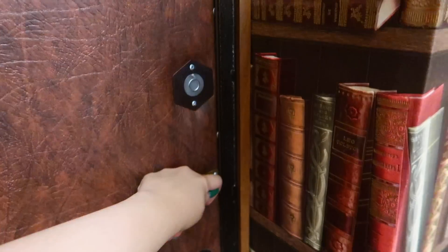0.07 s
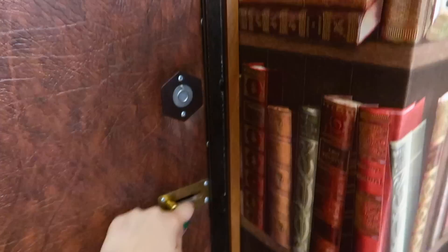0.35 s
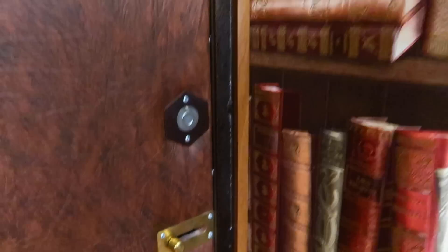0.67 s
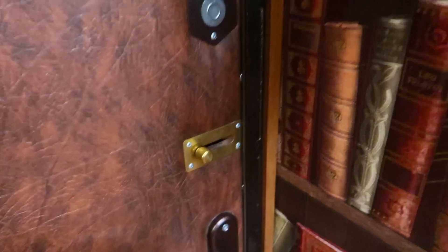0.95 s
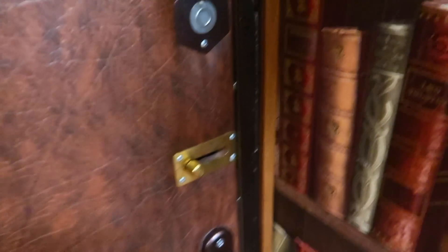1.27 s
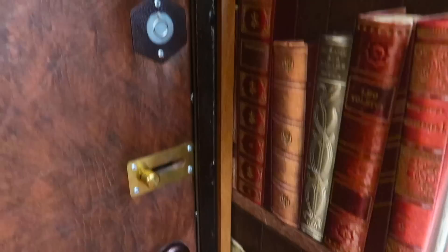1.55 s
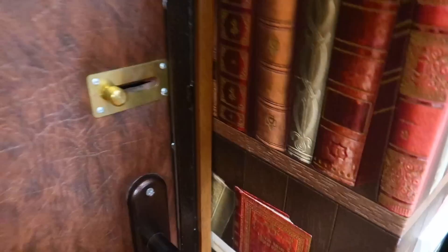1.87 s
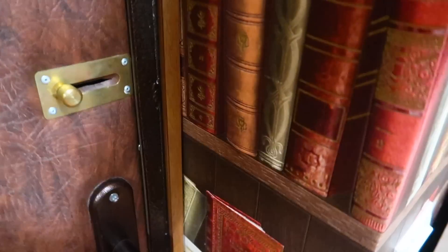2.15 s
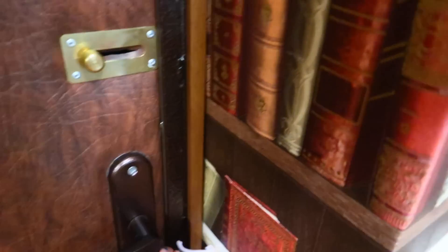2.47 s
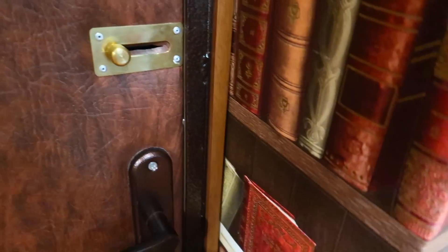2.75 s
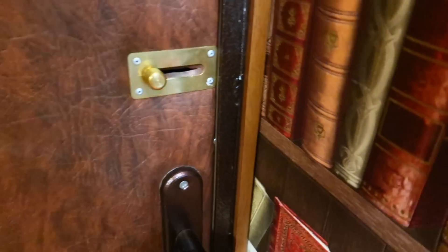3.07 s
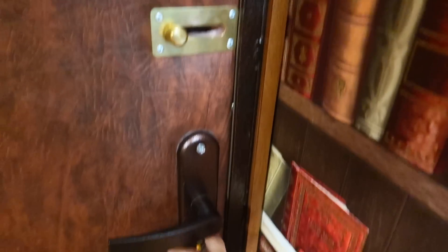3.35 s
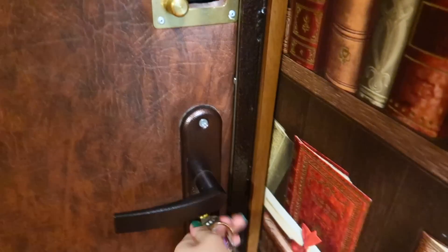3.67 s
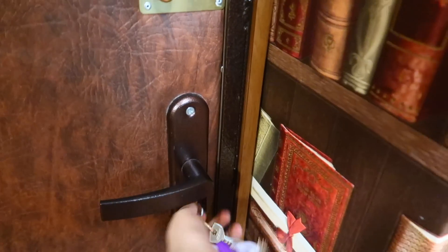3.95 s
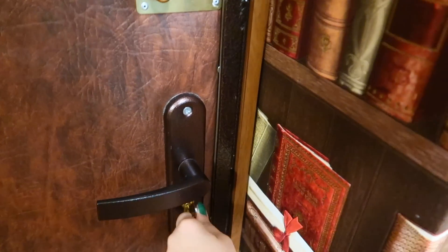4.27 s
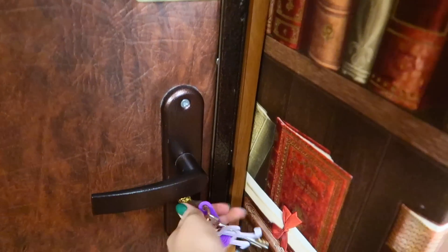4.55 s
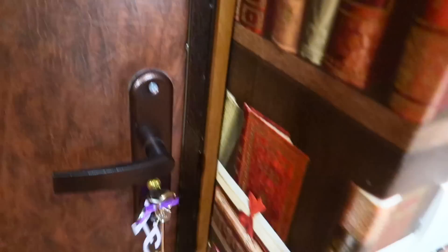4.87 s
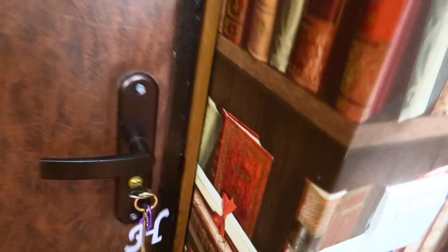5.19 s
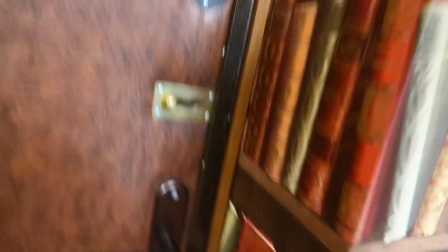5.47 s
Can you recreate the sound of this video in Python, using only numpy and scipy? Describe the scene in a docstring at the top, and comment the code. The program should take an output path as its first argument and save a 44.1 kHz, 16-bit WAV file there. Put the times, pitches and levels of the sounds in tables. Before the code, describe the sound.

A padded metal door is locked up close in a small apartment hall, its hits echoing briefly off near walls. A sleeve brushes softly, and at 0.3 seconds the door booms and rattles. More heavy knocks and low thumps come around 0.9 to 1.2 seconds, and a slide bolt slams home sharply at 1.5.

From 1.8 seconds a bunch of keys jingles, thin and bright, strongest near 2.5, while a key scrapes into the cylinder with small clicks. The key turns, and the steel lock clunks solidly at 3.1, then several more times between 3.5 and 4 amid tinkling. Another loud clunk lands at 4.5, and a sharp click with a bright key clink at 4.75.

From about 5.1 seconds to the end, fingers bump, scrape and creak on the microphone over a few last clicks and jingles. Faint room tone and handling rumble lie underneath throughout.

```python
"""In the small hall of a flat, a padded metal door is locked.
A sleeve brushes the padding, the slide bolt slams home and the door leaf booms. Then a bunch of keys
jingles, a key scrapes into the cylinder and turns, and the lock case clicks and clunks. Blows ring the
modes of leaf and case and echo off near walls; sliding parts stick and slip. Under it all lie still
air and the rumble of a hand on the microphone, which bumps, scrapes and creaks at the end."""
import sys
import numpy as np
from scipy import signal
from scipy.fft import rfft, irfft
from scipy.io import wavfile

SR = 44100
rng = np.random.default_rng(int(sys.argv[2]) if len(sys.argv) > 2 else 0)


def int16_out(signal):
    """Quantize to a 16-bit WAV file."""
    q = np.round(np.clip(np.atleast_2d(signal).T, -1, 1) * 32767)
    wavfile.write(sys.argv[1], SR, q.astype(np.int16))


N = 247930
AGE = np.arange(SR // 2) / SR   # seconds since a blow
MODE_SCATTER_DB, MODE_DETUNE = 2, .018   # each blow lands on another spot, under another load
PART_HZ, KEEPER_HZ = 4000, 5100   # ring of a middling steel part; of the keeper

# modes of the door leaf and, at the top, its bolt plate: f/Hz, level/dB, t60/s
LEAF_MODES = [(137, -8, 0.25), (167.3, -2.5, 0.27), (188.4, -3, 0.2), (223, -5.5, 0.23), (287.4, 4, 0.063),
              (331.4, 3.5, 0.1), (366, 9, 0.12), (410, 10, 0.089), (490, 8, 0.089), (571.5, 8.5, 0.064),
              (790, -1, 0.074), (854, -4, 0.12), (914, 8, 0.08), (1034, 20, 0.014), (1058, 6.5, 0.095),
              (1195, 10.5, 0.033), (1242, 12, 0.093), (1330, 8, 0.1), (1464, -14, 0.053),
              (1520, 27, 0.0097), (1868, -1.5, 0.078), (2000, -8, 0.16), (3500, 21.5, 0.02),
              (4900, -10, 0.058)]
# the three clear key tones: f/Hz, t60/s, phase lead of the left side/rad
CLEAR_KEY_TONES = [(8181, 0.22, 1.15), (10265, 0.38, 1.3), (13158, 0.2, 1.6)]
# spectrum of the jingling bunch: f/Hz, level/dB
JINGLE_SPECTRUM = [(3000, 23.5), (5200, 14), (7500, 9.5), (10000, 15.5), (13000, 8.5), (15500, 0)]


def from_db(db):
    """Decibels to gain."""
    return 10 ** (np.asarray(db) / 20)


def rms_one(x):
    """Scale to unit power."""
    return x / np.sqrt(np.mean(x ** 2) + 1e-20)


def at_hz(points, hz):
    """Read a table on a log-frequency axis."""
    f, value = np.transpose(points)
    return np.interp(np.log(np.maximum(hz, 1)), np.log(f), value)


def band(x, low, high, order=2):
    """Causal band-pass."""
    sos = signal.butter(order, [low, min(high, .45 * SR)], "band", fs=SR, output="sos")
    return signal.sosfilt(sos, x + 1e-18)


def colour(x, spectrum):
    """Give a steady sound a spectrum."""
    return irfft(rfft(x) * from_db(at_hz(spectrum, np.fft.rfftfreq(N, 1 / SR))), N)


def resonance(x, hz, width_hz):
    """Two-pole resonance with unit gain at its peak."""
    r = np.exp(-np.pi * width_hz / SR)
    feedback = [1, -2 * r * np.cos(2 * np.pi * hz / SR), r * r]
    return signal.lfilter((1 - r * r) / 2 * np.array([1, 0, -1]), feedback, x + 1e-18)


def rise(seconds):
    """Attack with the given time constant."""
    return 1 - np.exp(-AGE / seconds)


def fade(t60):
    """Decay by 60 dB in t60 seconds."""
    return np.exp(-np.log(1000) * AGE / max(t60, .002))


def add(track, s, sound):
    """Mix a sound in at s seconds."""
    i = int(s * SR)
    track[..., i:i + sound.shape[-1]] += sound[..., :N - i]


def diffuse(mid, side):
    """Sound from all around: alike at both ears in the bass, wide in the treble."""
    # side relative to mid: f/Hz, level/dB
    width = [(30, -40), (60, -46), (250, -14), (500, -22.5), (1000, -11), (2000, -11.5), (4000, -5),
             (8000, 0), (13000, 10.5)]
    return mid + colour(side, width) * [[1], [-1]]


def gestures(rows, attack_s, release_t60):
    """Each movement swells, holds and dies away; one gain curve per level column."""
    t, power = np.arange(N) / SR, 0
    for s, length, *db in rows:
        swell = np.clip((t - s) / attack_s, 0, 1)
        release = np.exp(-np.log(1000) * np.clip((t - s - length) / release_t60, 0, 2))
        power = power + (from_db(db)[:, None] * swell * release) ** 2
    return np.sqrt(power)


def slips(per_s, spread_db, smooth):
    """Tiny random stick-slip contacts over smooth friction, in two channels."""
    sizes = from_db(spread_db * np.minimum(rng.exponential(1, N), 4)) * (rng.random(N) < per_s / SR)
    grains = signal.lfilter([1], [1, -np.exp(-1 / (0.0041 * SR))], sizes)
    return (rms_one(grains) + smooth) * rng.standard_normal((2, N))


def blow(modes, register_db, rings, clatter_t60, clatter_db, crack_t60, crack_db, seat_s, treble_t60):
    """A crack, a clatter of dense modes and the body's main modes, balanced in five registers."""
    # edges of the boom, body, clack, tick and edge registers: f/Hz
    edges = [125, 300, 800, 2300, 7000, 14000]
    body = sum(from_db(db + rng.normal(0, MODE_SCATTER_DB)) * rng.choice([-1, 1]) * fade(t60)
               * np.sin(2 * np.pi * hz * rng.normal(1, MODE_DETUNE) * AGE) for hz, db, t60 in modes)
    envelope = from_db(clatter_db) * fade(clatter_t60) + from_db(crack_db) * fade(crack_t60)
    clatter = envelope * rng.standard_normal(len(AGE))
    # the struck parts add short rings of their own: f/Hz, relative bandwidth, level/dB
    parts = sum(from_db(db) * resonance(clatter, hz, damping * hz) for hz, damping, db in rings)
    hit = (body + clatter + parts) * rise(seat_s)
    out = 0
    for db, low, high in zip(register_db, edges, edges[1:]):
        losses = fade(treble_t60 * (PART_HZ / low))   # higher registers die sooner
        register = band(hit, low, high, order=3) * losses
        onset_rms = np.sqrt(np.mean(register[AGE < .02] ** 2))
        out = out + from_db(db) * register / onset_rms
    return out


def background():
    """Still air, and the rumble and rustle of a hand shifting on the microphone's case."""
    # room tone of the flat: f/Hz, level/dB
    air_spectrum = [(25, -5), (100, -0.5), (300, -8.5), (600, -5.5), (1200, -17.5), (3000, -19),
                    (7000, -31), (15000, -46)]
    # handling noise over time: t/s, rumble/dB, rustle/dB
    handling = [(0.0, -68, -59), (0.14, -68, -53.5), (0.45, -55, -50), (0.81, -55.5, -51),
                (1.11, -38.5, -38.5), (1.31, -55, -52.5), (1.81, -48, -52), (2.24, -60, -45.5),
                (3.46, -70, -53.5), (3.72, -66, -47), (4.05, -54, -50), (4.63, -70, -49), (4.88, -63, -61),
                (5.13, -69, -52.5), (5.31, -46, -37), (5.62, -54, -46)]
    times, *levels = np.transpose(handling)
    rumble_db, rustle_db = (np.interp(np.arange(N) / SR, times, db) for db in levels)
    air, hand = (diffuse(*rng.standard_normal((2, N))) for _ in range(2))
    rumble = from_db(rumble_db + 7) * rms_one(band(colour(hand, [(30, 7.0), (80, -19)]), 33.7, 62.0))
    rustle = from_db(rustle_db + 4) * rms_one(band(hand, 54, 260))
    return from_db(-51) * rms_one(colour(air, air_spectrum)) + rumble + rustle


def sleeve():
    """Hand and sleeve brush over the door's padding in soft swells."""
    # brushing movements: t/s, length/s, level/dB
    brushes = [(0.02, 0.18, -53), (0.485, 0.055, -41), (0.58, 0.16, -58), (0.8, 0.1, -57.5),
               (1.26, 0.16, -63), (1.38, 0.21, -56), (1.68, 0.13, -61), (1.8, 0.18, -45.5)]
    # cloth on padding: f/Hz, level/dB
    cloth_spectrum = [(300, 0), (700, -4), (1500, -0.5), (3000, -11.5), (6000, -19.5), (12000, -30),
                      (16000, -54)]
    swells, = gestures(brushes, attack_s=0.036, release_t60=0.28)
    friction = diffuse(*slips(per_s=120, spread_db=0, smooth=1.0))
    return swells * rms_one(colour(friction, cloth_spectrum))


def bolt():
    """The slide bolt snaps against plate and keeper on the padded leaf; softer contacts are duller."""
    # bolt contacts: t/s, clunk/dB, tick/dB, ring of the part/Hz, clatter t60/s, top of the spectrum/Hz
    snaps = [(0.158, -59, -31.5, 2220, 0.025, 3120), (0.233, -30, -83, 2970, 0.026, 676),
             (0.687, -27, -80, 4730, 0.013, 620), (0.838, -38, -44, 3900, 0.074, 6960),
             (1.06, -52, -30.5, 2800, 0.017, 4400), (1.113, -43, -20, 2880, 0.067, 8100),
             (1.132, -32, -34, 2600, 0.09, 6500), (1.496, -26, -9.5, 2670, 0.14, 8200),
             (1.504, -21.5, -19.5, 3180, 0.0092, 7500)]
    out = np.zeros(N)
    for s, clunk_db, tick_db, ring_hz, clatter_t60, top_hz in snaps:
        clack_db = (clunk_db + tick_db) / 2 + 3.5
        register_db = [clunk_db - 3, clunk_db, clack_db, tick_db, tick_db - 8.5]
        rings = [(500, .3, 7), (950, .25, 9), (ring_hz, .33, 15), (KEEPER_HZ, .25, -3)]
        hit = blow(LEAF_MODES, register_db, rings, clatter_t60, clatter_db=21,
                   crack_t60=0.011, crack_db=22.5, seat_s=0.00034, treble_t60=0.4)
        add(out, s, from_db(-8.5) * band(hit, 37, top_hz, order=3))
    return out


def door():
    """The leaf booms and clacks under heavy knocks, each taking a moment to seat, and rattles back."""
    # knocks and rebounds: t/s, boom/dB, body/dB, clack/dB, tick/dB, edge/dB, clatter t60/s
    knocks = [(0.306, -17, -15.5, -35, -35, -58, 0.048), (0.3133, -16, -19, -14.5, -18, -31.5, 0.041),
              (0.329, -7, -9, -18, -25.5, -35, 0.037), (0.362, -26, -22, -24, -54, -54, 0.05),
              (0.38, -22, -21, -28, -50, -60, 0.038), (0.935, -15, -24, -28, -34, -31, 0.14),
              (0.943, -22, -14, -20, -27, -28.5, 0.066), (0.965, -42, -24.5, -52, -49, -43, 0.12),
              (1.003, -25, -30, -36, -57, -52, 0.072), (1.03, -35, -32, -42, -56, -58, 0.06),
              (1.143, -21, -22, -41, -47, -55, 0.094), (1.178, -27, -33.5, -55, -60, -75, 0.046),
              (1.564, -33, -22, -34, -54, -51, 0.069), (1.58, -28, -17.5, -27.5, -35.5, -47, 0.072),
              (1.587, -29.5, -24, -36, -40, -54, 0.059), (1.618, -39, -25.5, -41, -50, -69, 0.06)]
    rings = [(4300, .25, 15), (KEEPER_HZ, .2, 4)]   # bolt plate and keeper
    out = np.zeros(N)
    for s, *register_db, clatter_t60 in knocks:
        hit = blow(LEAF_MODES, register_db, rings, clatter_t60, clatter_db=15,
                   crack_t60=0.039, crack_db=-21, seat_s=0.001, treble_t60=0.39)
        add(out, s, from_db(-4) * hit)
    return out


def rubbing():
    """Stick-slip strokes grate over a humming body, and the bunch of keys rustles and tinkles."""
    # scraping strokes of bolt and key, and of fingers on the microphone at the end:
    # t/s, length/s, body/dB, grit/dB
    strokes = [(0.4, 0.057, -37.5, -61), (0.495, 0.028, -32.5, -55), (0.785, 0.025, -36, -71),
               (0.99, 0.074, -38.5, -51.5), (1.12, 0.0065, -33, -36), (1.2, 0.059, -46.5, -80),
               (1.585, 0.043, -33.5, -48.5), (1.89, 0.24, -39, -43), (2.2, 0.39, -35, -43),
               (2.43, 0.093, -30, -44.5), (2.76, 0.13, -36, -53.5), (3.025, 0.095, -35.5, -46.5),
               (3.1, 1, -43, -57), (3.49, 0.22, -37, -52), (3.66, 0.062, -34, -41.5),
               (3.79, 0.56, -58, -75), (4.0, 0.27, -42.5, -54), (4.47, 0.052, -30, -42),
               (4.56, 0.11, -36, -49.5), (4.73, 0.067, -44, -54), (4.97, 0.26, -46.5, -50.5),
               (5.25, 0.055, -62, -40), (5.37, 0.37, -50, -57)]
    # the bunch is shaken or brushes the hand: t/s, length/s, level/dB
    shakes = [(1.86, 0.061, -30.5), (1.99, 0.025, -24), (2.12, 0.05, -31), (2.22, 0.18, -33),
              (2.43, 0.17, -38), (2.52, 0.096, -25), (2.71, 0.058, -35), (3.08, 0.49, -56),
              (3.52, 0.15, -31.5), (3.64, 0.091, -36), (3.79, 0.024, -35), (3.965, 0.055, -42),
              (4.04, 0.12, -50), (4.32, 0.16, -54), (4.62, 0.085, -43.5), (4.7, 0.1, -26.5),
              (4.89, 0.022, -43), (5.125, 0.21, -40.5), (5.25, 0.16, -42)]
    # colour of the scraping: f/Hz, level/dB
    scrape_spectrum = [(250, -39), (380, 2.5), (460, 10.5), (620, -1.5), (900, -5), (1400, -7.5),
                       (2400, -14.5), (4000, -18)]
    pressure, grit = gestures(strokes, attack_s=0.0093, release_t60=0.29)
    shaking, = gestures(shakes, attack_s=0.023, release_t60=0.17)
    contacts = diffuse(*slips(per_s=260, spread_db=3, smooth=.6))
    grating = colour(contacts, scrape_spectrum)
    body = from_db(-1) * pressure * rms_one(band(grating, 368, 744, order=3))
    scrape = from_db(2) * grit * rms_one(band(grating, 1340, 5700))
    rustle = .7 * rms_one(band(colour(contacts, JINGLE_SPECTRUM), 3000, 16500))
    chinks = .9 * tinkle(per_s=1300, t60=.1, spread_db=2.8, pitch_count=56)
    return body + scrape + from_db(-9) * shaking * (rustle + chinks) + key_shimmer(shaking)


def clinks():
    """Small steel parts touch: high modes ring for an instant while the parts skid and chatter."""
    # touches of keys, key ring and other small steel: t/s, level/dB, f/Hz
    touches = [(0.693, -43.5, 5640), (0.888, -44.5, 11200), (1.859, -36, 9100), (1.881, -31.5, 8230),
               (1.892, -37, 8400), (2.002, -23, 13700), (2.009, -29, 14000), (2.147, -35, 13000),
               (2.23, -25, 13300), (2.242, -26.5, 10800), (2.25, -31, 13400), (2.286, -35, 11600),
               (2.31, -25, 6730), (2.311, -27, 13400), (2.356, -29, 10000), (2.501, -37, 8000),
               (2.509, -34, 8000), (2.524, -19, 8400), (2.533, -22, 13000), (2.59, -22, 5250),
               (2.603, -24, 12300), (2.611, -32, 12400), (2.619, -22.5, 5300), (2.738, -19.5, 4900),
               (2.71, -26, 5200), (2.753, -28.5, 9800), (2.761, -31, 6460), (2.856, -46, 8100),
               (2.999, -31.5, 7300), (3.03, -39, 7400), (3.039, -35, 7050), (3.758, -15, 5400),
               (3.758, -24, 10100), (3.768, -20, 7260), (3.8602, -16, 6070), (4.047, -27.5, 5900),
               (4.103, -26.5, 7400), (4.134, -28.5, 6770), (4.39, -44, 11200), (4.436, -31, 9560),
               (4.449, -33, 8900), (4.695, -22, 6000), (4.744, -29, 6400), (4.757, -4, 5300),
               (4.764, -20, 5700), (4.961, -45, 4300), (5.112, -43, 11800), (5.132, -28, 12000),
               (5.314, -31, 10200), (5.422, -25, 12800)]
    # modes of a small part: multiple of the pitch, level/dB
    modes = [(.86, -8), (1, 4.5), (1.09, -10.5), (1.31, -15.5), (1.621, -17)]
    envelope = fade(0.0098) + from_db(-28) * fade(0.043)   # contact damps the ring; a thin tail lingers
    out = np.zeros(N)
    for s, db, hz in touches:
        ring = sum(from_db(mode_db)
                   * np.sin(2 * np.pi * (hz * ratio * rng.normal(1, MODE_DETUNE) * AGE + rng.random()))
                   for ratio, mode_db in modes)
        skid = rms_one(resonance(rng.standard_normal(len(AGE)), hz, 0.12 * hz))
        chatter = from_db(-5.5) * skid * fade(0.034)
        add(out, s, from_db(db - 5) * (ring * envelope + chatter) * rise(0.00063))
    return out


def thumps():
    """Dull low thumps: first at the door, then handling bumps on the microphone."""
    # low, dying tones: t/s, level/dB, f/Hz, t60/s
    bumps = [(0.937, -16, 66, 0.1), (0.939, -25.5, 106, 0.27), (1.148, -19.5, 31.06, 0.79),
             (1.151, -24, 101, 0.35), (5.128, -28, 141, 0.17), (5.141, -15.5, 71, 0.086),
             (5.141, -30, 37.8, 0.53), (5.597, -31.5, 145, 0.3)]
    out = np.zeros(N)
    for s, db, hz, t60 in bumps:
        add(out, s, from_db(db) * np.sin(2 * np.pi * hz * AGE) * fade(t60))
    return out


def lock():
    """Key, pins and levers strike inside the steel case; a faint hiss swells just before each click."""
    # contacts in the lock: t/s, clunk/dB, tick/dB, clunk/Hz, ring of the part/Hz
    clicks = [(1.852, -38, -43, 437, 6100), (1.968, -20, -37.5, 484, 2900), (2.002, -18.5, -32, 392, 8400),
              (2.093, -19, -20, 560, 2740), (2.234, -27, -35.5, 453, 5600), (2.31, -26, -29.5, 441, 4400),
              (2.457, -19, -30.5, 410, 4900), (2.501, -24.5, -40, 443, 8100), (2.71, -57, -42, 463, 5070),
              (2.725, -38, -47, 430, 5100), (2.754, -33, -36.5, 550, 5700), (2.854, -41, -60, 450, 8170),
              (3.384, -46, -43.5, 443, 5030), (3.051, -15.5, -38.5, 490, 3020),
              (3.071, -25.5, -44, 436, 2260), (3.0947, -12.5, -20.5, 483, 2870),
              (3.099, -9.5, -22.5, 500, 2400), (3.272, -44, -31.5, 440, 5370), (3.308, -42, -37, 430, 4900),
              (3.491, -21.5, -43.5, 420, 3720), (3.547, -24.5, -50, 443, 8100),
              (3.584, -14.5, -24, 490, 2900), (3.594, -18.5, -24, 474, 4700),
              (3.637, -23.5, -33, 454, 5100), (3.758, -48, -25.5, 400, 5050),
              (3.768, -26.5, -21, 405, 5000), (3.799, -15, -28.5, 490, 2650), (3.839, -30, -51, 450, 3500),
              (3.861, -39, -41, 426, 6100), (3.964, -19, -35, 470, 2660), (3.977, -26, -28, 463, 4050),
              (4.003, -37, -32, 540, 6650), (4.046, -61, -49, 425, 5650), (4.102, -31, -36, 624, 6360),
              (4.171, -25.5, -55, 467, 4600), (4.185, -67, -42.5, 455, 5100), (4.23, -37, -35.5, 454, 5000),
              (4.316, -31.5, -48, 430, 2780), (4.442, -27, -34.5, 595, 6840), (4.516, -21, -31, 510, 4300),
              (4.521, -6.5, -17, 640, 4300), (4.527, -15.5, -34, 725, 2360), (4.548, -28.5, -58, 646, 2300),
              (4.691, -24, -28, 480, 5670), (4.702, -33, -27, 557, 5100), (4.743, -28, -34, 524, 6420),
              (4.7585, -14.5, -14.5, 436, 2830), (4.777, -23, -57, 455, 4780), (4.802, -29, -53, 450, 2600),
              (4.822, -32, -41, 440, 2400), (4.849, -30.5, -30.5, 441, 4130),
              (4.872, -32.5, -29, 420, 5600), (4.953, -29.5, -40.5, 487, 4630),
              (4.958, -38, -27, 635, 4000), (5.021, -61, -38, 450, 4520), (5.13, -36, -37.5, 343, 3600),
              (5.319, -11.5, -35.5, 576, 4700), (5.338, -43, -49, 437, 5000),
              (5.412, -25.5, -31, 387, 4300)]
    # modes of the lock case: f/Hz, level/dB, t60/s
    case_modes = [(404, 4, 0.076), (441, 7.5, 0.06), (492, -7, 0.18), (550, 0.5, 0.064), (632, -9.5, 0.13),
                  (781, -16, 0.17), (1276, 2.5, 0.065), (1530, 11, 0.014), (2400, -8.5, 0.063),
                  (3020, -30, 0.05), (3120, -6.5, 0.15), (3445, 11, 0.023), (5100, 18, 0.007),
                  (5900, 17, 0.01)]
    usual_tick_db, hiss_s = -33.5, .006
    out, lead_in = np.zeros(N), AGE[AGE < hiss_s]
    for s, clunk_db, tick_db, clunk_hz, ring_hz in clicks:
        # a smaller, higher part has less clack, more edge, a clearer ring and a shorter clatter
        pitch = ring_hz / PART_HZ
        octaves = np.log2(pitch)
        clack_db = (clunk_db + tick_db) / 2 - 2.5 - octaves
        edge_db = tick_db - 7.5 + 5.5 * octaves
        case_db = [clunk_db, clack_db, tick_db, edge_db]
        boom_db = clunk_db - 14.5   # a little of each blow passes into the leaf
        # a harder tick cracks louder, seats faster and chokes its clatter sooner
        hard_db = tick_db - usual_tick_db
        hardness = from_db(hard_db)
        rings = [(clunk_hz, .35, 10), (ring_hz, .13, 7 + 3 * octaves)] + pin_overtones(hard_db)
        hit = blow(case_modes, [boom_db, *case_db], rings,
                   clatter_t60=0.1 / hardness ** 0.18 / pitch ** 0.055, clatter_db=12,
                   crack_t60=0.0024, crack_db=19 + 0.47 * hard_db,
                   seat_s=0.0002 / hardness ** 0.69, treble_t60=0.36)
        add(out, s, from_db(-7.5) * hit)
        hiss = rms_one(band(rng.standard_normal(len(lead_in)), 470, 3800))
        add(out, s - lead_in[-1], from_db(np.mean(case_db) - 5) * hiss * lead_in / lead_in[-1])
    return out


def pin_overtones(hard_db):
    """Each contact finds three narrow overtones of key and pins; light touches ring most clearly."""
    clear_db = min(11 - .6 * hard_db, 17)
    ranges = [(4200, 7000, 0), (7000, 10500, -2), (10500, 14000, -3)]   # low/Hz, high/Hz, level/dB
    return [(rng.uniform(low, high), .022, clear_db + db) for low, high, db in ranges]


def tinkle(per_s, t60, spread_db, pitch_count):
    """Keys and ring touch at random in the hand; each touch rings briefly at one of many pitches."""
    sizes = from_db(spread_db * np.minimum(rng.exponential(1, N), 3))
    touches = sizes * (rng.random(N) < per_s / SR) * rng.choice([-1, 1], N)
    pitch_index = rng.integers(0, pitch_count, N)
    pitches = np.geomspace(4100, 14900, pitch_count) * rng.uniform(.98, 1.02, pitch_count)
    out = 0
    for k, hz in enumerate(pitches):
        pole = from_db(-60 / (t60 * SR)) * np.exp(2j * np.pi * hz / SR)
        ring = signal.lfilter([1], [1, -pole], touches * (pitch_index == k) + 1e-18)
        ear_phases = rng.normal(0, 0.85, (2, 1))
        out = out + np.real(ring * np.exp(1j * ear_phases))
    return rms_one(colour(out, JINGLE_SPECTRUM))


def key_shimmer(shaking):
    """Countless light touches keep the clear key tones ringing while the bunch moves."""
    out = 0
    for hz, t60, lead in CLEAR_KEY_TONES:
        r = from_db(-60 / (t60 * SR))
        touches = shaking * rng.standard_normal(N) + 1e-18
        ring = signal.lfilter([np.sqrt(1 - r * r)], [1, -r * np.exp(2j * np.pi * hz / SR)], touches)
        out = out + np.real(ring * np.exp(1j * np.array([[lead], [0]])))
    return from_db(-19.5) * out


def hanging_keys():
    """Struck keys ring thin and high and buzz on their neighbours until a key or finger stops them."""
    # strikes on a hanging key: t/s, f/Hz, level/dB, t60/s, free ringing time/s
    strikes = [(1.88, 8230, -27, 0.082, 0.028), (1.905, 10265, -45, 0.27, .06),
               (1.92, 4850, -39, 0.28, 0.053), (2.1, 5330, -40, 0.38, .1), (2.146, 13158, -30.5, 0.2, 0.04),
               (2.146, 10150, -35.5, 0.21, 0.041), (2.16, 8181, -34, 0.28, 0.028),
               (2.19, 4280, -43, 0.99, .2), (2.36, 5260, -43, 0.45, .1), (2.315, 7300, -49, .25, .04),
               (2.354, 10330, -28.5, 0.33, 0.026), (2.526, 13200, -21, 0.19, .04),
               (2.531, 8170, -13, 0.34, 0.065), (2.535, 4520, -28, 0.34, 0.043),
               (2.56, 15200, -44, .2, 0.022), (2.572, 13158, -27, .3, .05), (2.595, 12200, -31, .2, .025),
               (2.61, 10265, -32, 0.33, 0.13), (2.66, 8181, -53, 0.77, .15), (2.66, 13158, -55, 0.38, .08),
               (2.71, 10350, -39.5, 0.55, .16), (2.712, 5200, -32, .15, .04),
               (2.725, 5160, -15, 0.036, .06), (3.272, 5290, -43, .4, 0.14),
               (3.512, 10265, -33.5, 0.22, 0.057), (3.512, 11650, -37, .1, .03),
               (3.545, 8180, -29, 0.092, .03), (3.6, 8230, -24.5, 0.081, .05),
               (3.663, 13158, -36, 0.23, .06), (3.663, 14900, -48, .25, 0.056),
               (3.69, 10300, -29, 0.21, 0.037), (3.71, 8100, -37, 0.18, 0.018),
               (3.766, 5100, -11.5, 0.04, .04), (4.7, 13158, -29, 0.1, .05),
               (4.761, 5370, -23, 0.067, 0.069), (4.78, 4100, -48, .9, .33), (5.085, 10265, -49, 0.27, .04),
               (5.23, 10265, -59, 0.48, 0.087), (5.323, 8160, -28, 0.14, .03),
               (5.348, 10265, -24.5, 0.12, 0.083), (5.425, 10265, -31.5, 0.19, 0.11),
               (5.47, 13158, -58, .45, .09), (5.505, 4310, -48.5, 1, .08), (5.57, 8181, -51, 0.4, 0.043)]
    stopped_t60 = 0.12
    leads = [(hz, lead) for hz, _, lead in CLEAR_KEY_TONES]
    out = np.zeros((2, N))
    for s, hz, db, t60, free_s in strikes:
        phase = 2 * np.pi * (hz * AGE + rng.random()) + np.array([[at_hz(leads, hz)], [0]])
        buzz = from_db(-14) * rms_one(band(rng.standard_normal((2, len(AGE))), 40, 700))
        hiss = rms_one(band(rng.standard_normal(len(AGE)), 4500, 14000))
        sizzle = from_db(-19) * hiss * fade(0.18)   # the key swings on its ring
        stopped = np.exp(-np.log(1000) * np.maximum(AGE - free_s, 0) / stopped_t60)
        envelope = rise(0.0029) * fade(t60) * stopped
        add(out, s, from_db(db) * (np.sin(phase) * (1 + buzz) + sizzle) * envelope)
    return out


def creaks():
    """The microphone's case slips under the fingers: a dry crack and a short plastic ring."""
    # single slips: t/s, peak/dB, f/Hz
    ticks = [(5.059, -44, 2400), (5.078, -33, 2340), (5.096, -31, 2320), (5.119, -29.5, 2380),
             (5.251, -31, 1610), (5.261, -31, 1640), (5.309, -23, 1810), (5.339, -21, 1510),
             (5.399, -26, 1640), (5.413, -22.5, 1850), (5.422, -16.5, 1770), (5.449, -25.5, 1590),
             (5.59, -31.5, 1490)]
    out = np.zeros(N)
    for s, db, hz in ticks:
        crack = band(rng.standard_normal(len(AGE)), 900, 8000) * fade(0.016) * rise(.001)
        tick = resonance(crack, hz, 0.17 * hz) + from_db(-17.5) * crack
        add(out, s, from_db(db) * tick / np.abs(tick).max())
    return out


def grip():
    """Skin sticks and slips right beside the microphone's ports, differently at each."""
    # shifts of the fingers: t/s, length/s, level/dB
    shifts = [(5.14, 0.0096, -34.5), (5.245, 0.066, -31), (5.32, 0.0097, -27), (5.41, 0.005, -24.5),
              (5.46, 0.15, -43), (5.6, 0.03, -32.5)]
    # skin on the case: f/Hz, level/dB
    skin_spectrum = [(40, -9), (130, 1), (300, 1), (450, 2), (700, -10), (2000, -10.5), (5000, -13.5),
                     (12000, -25)]
    swells, = gestures(shifts, attack_s=0.0019, release_t60=0.24)
    mid, side = rms_one(colour(slips(per_s=320, spread_db=3.5, smooth=0.49), skin_spectrum))
    return swells * (from_db(-10.5) * mid + side * [[1], [-1]])


def hall(x):
    """Dense reflections off near walls, dying band by band."""
    # decay of the hall: f/Hz, t60/s
    decay = [(100, 0.6), (500, 0.24), (2000, 0.17), (6000, 0.24), (14000, 0.039)]
    # reverberant share: f/Hz, level/dB
    wet = [(100, -9.5), (500, -7), (2000, -2.5), (6000, -7.5), (14000, -2)]
    # side of the reflections relative to mid: f/Hz, level/dB
    width = [(100, -51), (250, -24), (500, -27), (1000, -16.5), (2000, -13), (4000, -6), (8000, 6.5)]
    build_up = 1 - np.exp(-(AGE / 0.00047) ** 2)
    response, edges = 0, np.geomspace(70, 12500, 10)
    for low, high in zip(edges, edges[1:]):
        hz = np.sqrt(low * high)
        mid, side = band(rng.standard_normal((2, len(AGE))), low, high)
        reflections = mid + from_db(at_hz(width, hz)) * side * [[1], [-1]]
        tail = fade(at_hz(decay, hz)) * build_up
        gain = from_db(at_hz(wet, hz)) / np.sqrt(np.sum(tail ** 2))
        response = response + gain * tail * reflections
    return signal.fftconvolve(x[None], response, axes=1)[:, :N]


def scene():
    """Door and lock straight ahead; their hits stir the hall, everything else stays dry."""
    hits = door() + bolt() + lock() + clinks()
    return (hits + hall(hits) + hanging_keys() + thumps() + rubbing() + sleeve()
            + background() + grip() + creaks())


def record(dry):
    """The highest peaks are rounded and the top is cut."""
    stopband_hz = 16600
    rounded = 2 * np.tanh(dry / 2)
    return signal.sosfilt(signal.cheby2(12, 60, stopband_hz, fs=SR, output="sos"), rounded)


dry = scene()
out = record(dry)
int16_out(out)
```